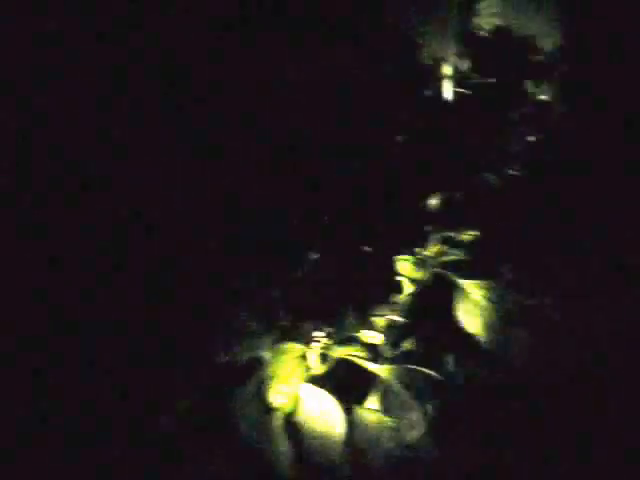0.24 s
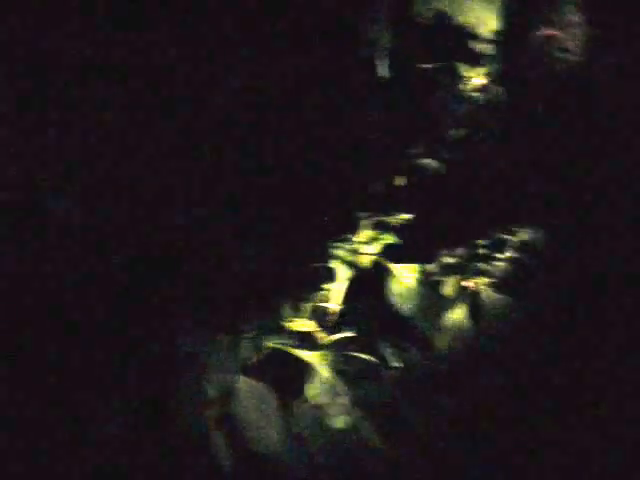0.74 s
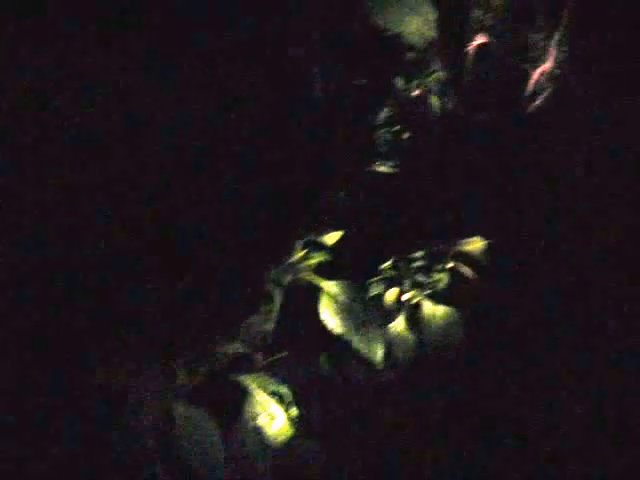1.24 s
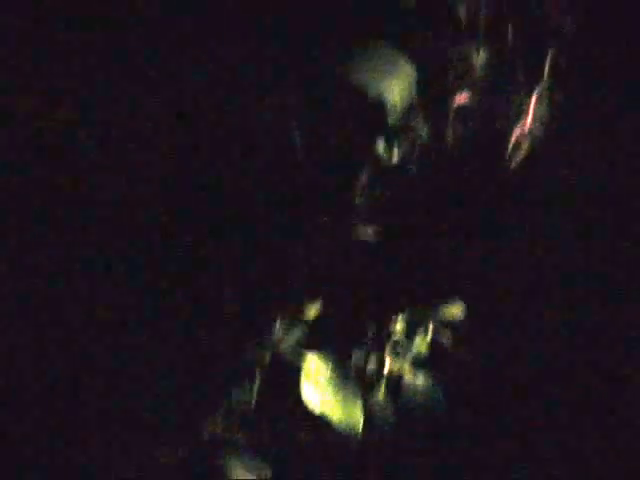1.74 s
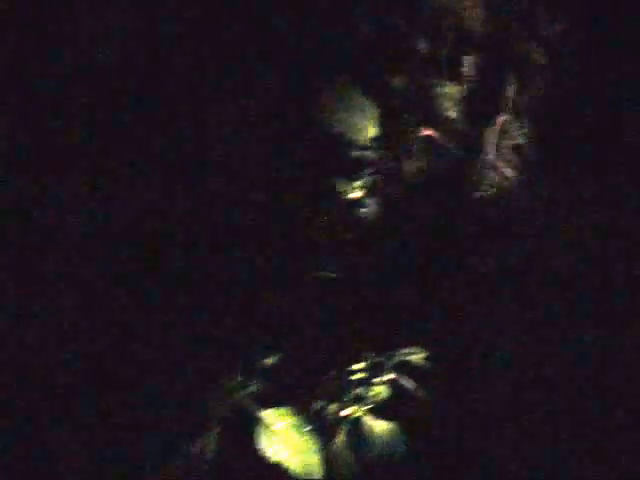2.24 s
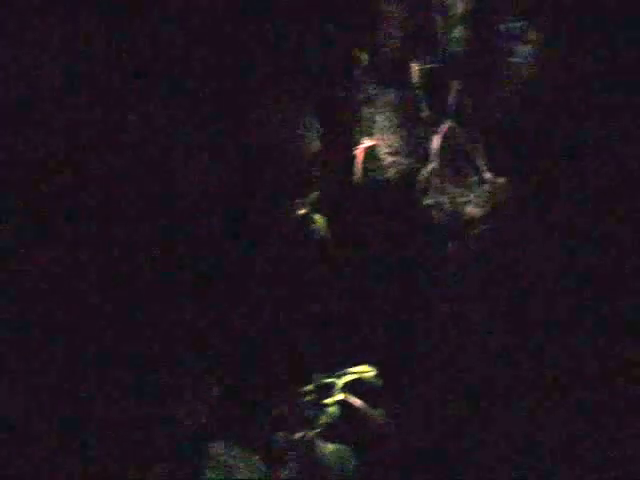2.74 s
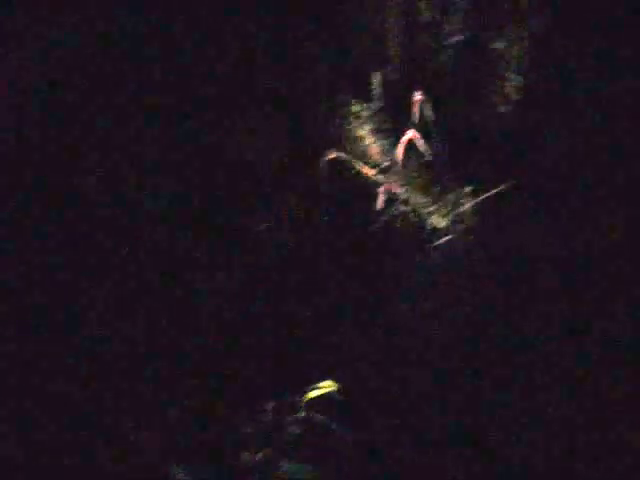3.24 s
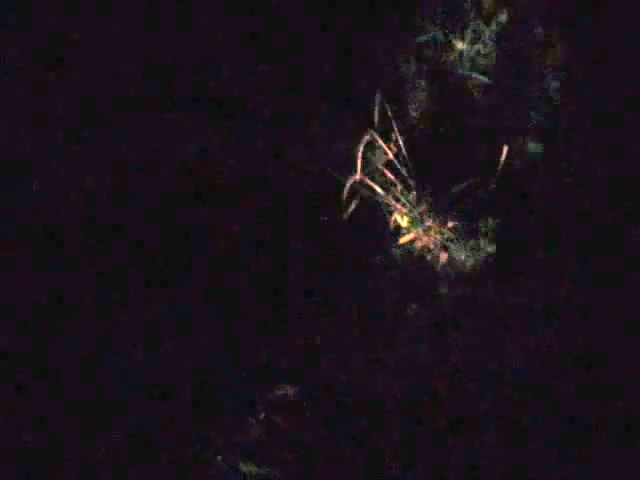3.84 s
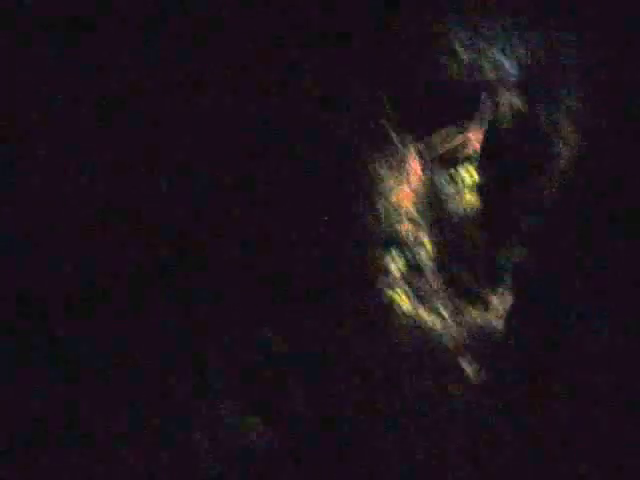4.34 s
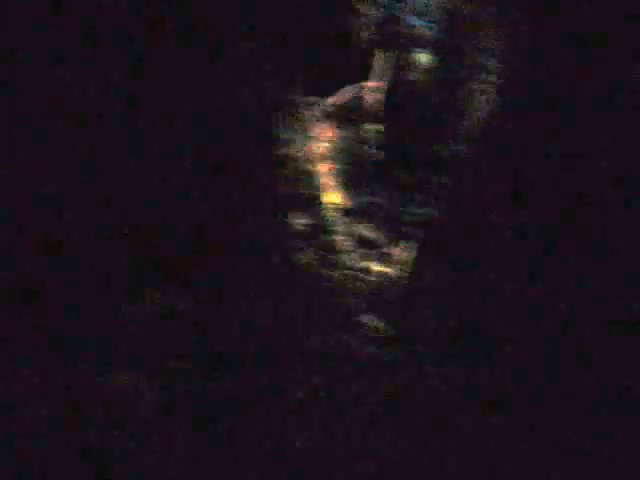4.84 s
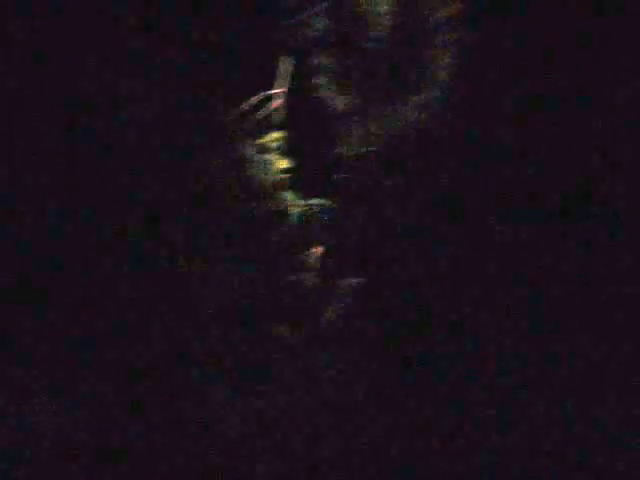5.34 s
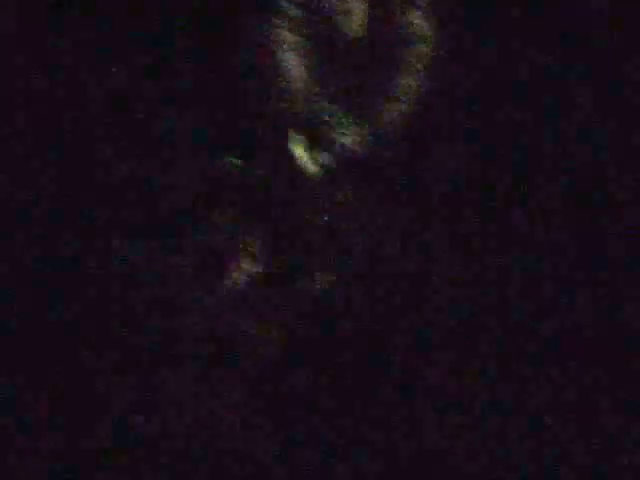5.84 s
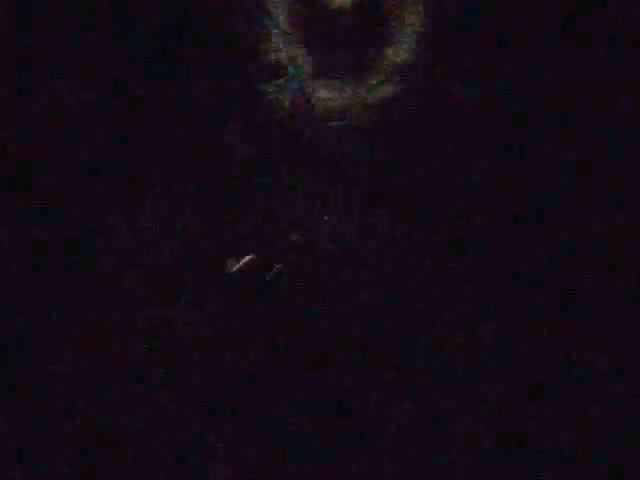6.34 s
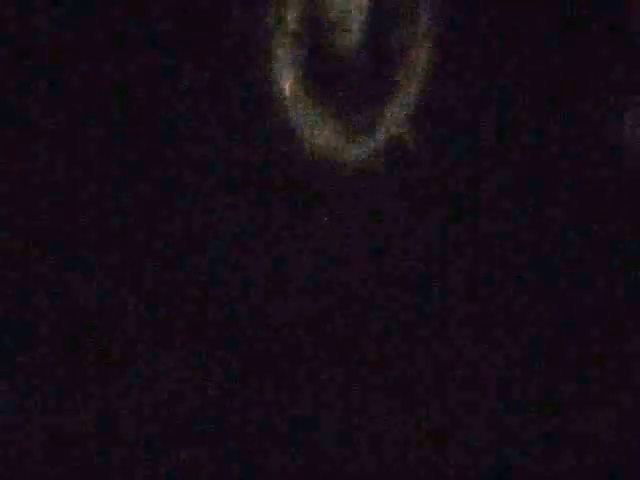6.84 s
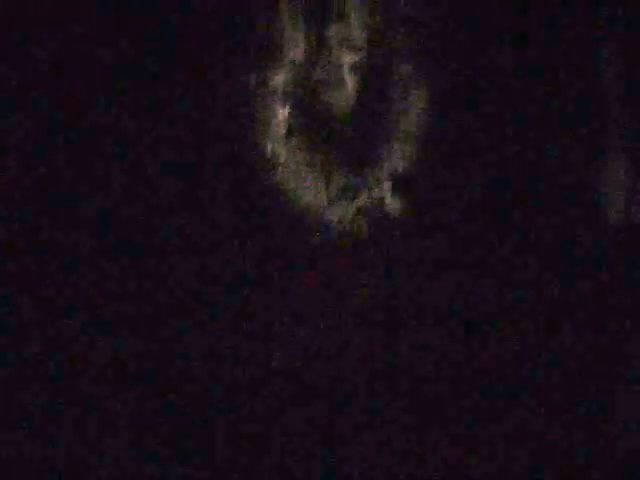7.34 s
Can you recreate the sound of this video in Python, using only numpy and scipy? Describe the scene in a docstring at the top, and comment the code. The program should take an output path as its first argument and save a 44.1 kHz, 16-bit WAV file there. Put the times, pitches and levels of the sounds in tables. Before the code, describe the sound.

Night insects trill steadily outdoors while frogs call close by. First come two strong, buzzing snores like a thumb drawn over a stiff comb, then two fast bursts of speeding knocks, softer croaks and throaty clucks, and finally mostly insects. Short echoes from bank and bushes surround the calls. The small camera microphone sounds coarse, with rough quantised noise, dull rumble and a metallic mirrored edge in the treble.

```python
"""A pond edge at night. From the start a near cricket trills about once a second over far ones and low air rumble.
Two loud frog snores, snap pairs ringing a vocal sac, swell within 0.2-1.6 s; a chuckle of speeding knocks with clucks
follows at 2.6 s over a faint snore, a second chuckle at 3.7 s, two weaker snores and lone clucks at 4.0-5.1 s,
and two faint snores after 6.4 s. A small camera stores it all coarsely: few levels, a low sampling rate and
held samples, which mirror the sound upwards."""
import sys
import numpy as np
from scipy import signal
from scipy.fft import rfft, irfft
from scipy.io import wavfile

SR = 44100
rng = np.random.default_rng(int(sys.argv[2]) if len(sys.argv) > 2 else 0)


def pcm_store(signal):
    """Save signal as 16-bit PCM."""
    levels = np.round(np.clip(np.atleast_2d(signal), -1, 1) * 32767)
    wavfile.write(sys.argv[1], SR, levels.astype(np.int16).T)


N = 334719


def snore(start_s, end_s, lower_s, lower_db, lower_rise_db, upper_s, upper_db, upper_rise_db,
          upper_hz, lower_hz, strong_s, first_per_s, last_per_s, weak, rasp):
    """The throat snaps shut in strong-weak pairs; snaps and the rasp of air behind them ring the vocal sac."""
    # Each row: factor on the centre, width of one pole in Hz, level in dB.
    lower_sac = [(0.861, 288.3, -3), (1.02, 299, 1), (1.21, 321, -3.5), (1.53, 636, -8)]
    # Each row: factor on the centre, width of one pole in Hz, level in dB.
    upper_sac = [(.69, 717, -5.5), (.87, 544, -4), (1.021, 491.4, -1), (1.141, 466, -3)]
    weak_lag_pairs, jitter_pairs, spread_db = .47, .01, .27
    early_weak, doubles_at, doubles_over = .35, .42, .1  # weak/strong ratio; the others are shares of the length
    doubling_db = 9.5  # lower resonances gain this per unit of weak/strong ratio
    puff_s = .0035

    t = np.arange(start_s, end_s, 1 / SR)
    length_s = end_s - start_s
    u = (t - start_s) / length_s

    # running count of pairs, whole at strong_s but for the jitter
    pairs = np.cumsum(np.linspace(first_per_s, last_per_s, len(t))) / SR
    pairs += jitter_pairs * drift(100, len(t)) - np.interp(strong_s, t, pairs)
    pairs = np.maximum.accumulate(pairs)
    strong_snaps = np.diff(np.floor(pairs), prepend=np.floor(pairs[0]))
    lagged = np.floor(pairs - weak_lag_pairs)
    weak_snaps = np.diff(lagged, prepend=lagged[0])
    weak_ratio = np.interp(u, [doubles_at, doubles_at + doubles_over], [early_weak, weak])
    scatter = gain_of(spread_db * np.clip(rng.standard_normal(len(t)), -2, 2))
    snaps = (strong_snaps + weak_ratio * weak_snaps) * scatter

    # each puff of air swells, then dies
    fade = np.exp(-1 / (puff_s * SR))
    puff_level = signal.lfilter([1], [1, -2 * fade, fade ** 2], snaps)
    puffs = evened(puff_level * rng.choice([-1., 1.], len(t)))

    def drive(rasp_share):
        return np.sqrt(1 - rasp_share) * evened(snaps) + np.sqrt(rasp_share) * puffs

    lower_swell_db = hill(u, (lower_s - start_s) / length_s, lower_rise_db, 14.5, 1.5, 1.8)
    lower_swell_db += doubling_db * (weak_ratio - weak)
    lower = gain_of(lower_db + lower_swell_db) * sac(drive(rasp), lower_hz, lower_sac)

    upper_swell_db = hill(u, (upper_s - start_s) / length_s, upper_rise_db, 17.5, 2., 1.7)
    upper_centre_hz = upper_hz + hill(u, .33, 330., 470., 1.8, 1.6)
    # rasp favours the treble
    upper = gain_of(upper_db + upper_swell_db) * sac(drive(rasp ** .6), upper_centre_hz, upper_sac)
    return start_s, (lower + upper) * signal.windows.tukey(len(t), .12)


def chuckle(start_s, count, first_gap_s, last_gap_s, db, upper_db, pitch):
    """Knocks on the vocal sac whose gaps shrink evenly; the first is duller, the last ones fade."""
    knock_s, first_dull_db, fade_db = .014, -3.5, -2
    out = np.zeros(SR // 2)
    gaps_s = np.linspace(first_gap_s, last_gap_s, count - 1)
    for k, knock_at_s in enumerate(np.cumsum(np.r_[0, gaps_s])):
        knock_db = db + fade_db * (k / (count - 1)) ** 3
        knock_upper_db = upper_db + first_dull_db * (k == 0)
        add(out, *note(knock_at_s, knock_db, knock_upper_db, pitch, knock_s))
    return start_s, out


def note(start_s, db, upper_db, pitch, length_s):
    """Knock or cluck: a short bundle of snaps and rasp rings the sac, then a dying tail of rasp."""
    # Sac of the chuckler. Each row: frequency in Hz, width of one pole in Hz, level in dB.
    note_sac = [(1110, 350, 3.5), (1433, 360, -4), (1874, 460, -2), (2340, 390, -1), (2550, 370, 2.5),
                (2986, 500, -4), (3490, 650, -13)]
    pulses_per_s, tail_db, tail_s, lower_tail_db = 250, -3.5, .026, -3.
    t = np.arange(4000) / SR
    snaps = ticks(pulses_per_s * (1 + .12 * drift(300, len(t))))
    rasp = rng.choice([-1., 1.], len(t))
    bundle_level = np.clip((length_s - t) / .004, 0, 1) * np.minimum(t / .0025 + .5, 1)
    bundle = (.65 * evened(snaps) + .75 * rasp) * bundle_level
    tail = gain_of(tail_db) * np.exp(-t / tail_s) * np.minimum(t / .0048, 1) * rasp
    lower = bundle + gain_of(lower_tail_db) * tail
    upper = bundle + tail

    ring = np.zeros(len(t))
    for k, (hz, width_hz, mode_db) in enumerate(note_sac):
        is_upper = k > 2
        level = (-1) ** k * gain_of(mode_db + upper_db * is_upper)
        ring += level * resonate(upper if is_upper else lower, pitch * hz, width_hz)
    near_peak = np.percentile(abs(ring[:3000]), 99)
    return start_s, gain_of(db) * ring / near_peak


def cricket():
    """Near cricket: runs of wing strokes that swell and stop short."""
    # Each row: start in seconds, end in seconds, level at the end in dB before the edge taper.
    trills = [(0., 0.263, -45.5), (0.799, 1.157, -42), (1.821, 2.113, -42), (2.756, 3.069, -41),
              (3.739, 4.04, -41), (4.604, 4.933, -44.5), (5.598, 5.868, -43.5), (6.552, 6.807, -44.5),
              (7.299, 7.589, -44.5)]
    wing_hz, strokes_per_s, swell_db = 4995, 133, 5.5
    out = np.zeros(N)
    for start_s, end_s, db in trills:
        size = round((end_s - start_s) * SR)
        swell = gain_of(db - swell_db * np.linspace(1, 0, size) ** 2)
        edges = signal.windows.tukey(size, .15)
        add(out, start_s, swell * edges * wings(wing_hz, strokes_per_s, size))
    return out


def chorus():
    """Far crickets, two near each pitch, whose stroking wings swell and fade on their own."""
    # Each row: wing frequency in Hz, level in dB.
    far_crickets = [(4400, -7.5), (4520, -6), (4650, -4), (4760, -2), (4870, -2), (4980, -0.5), (5090, -2),
                    (5190, -3.5), (5290, -4.5), (5380, -13)]
    chorus_db = -42.5
    far = np.zeros(N)
    for hz, db in far_crickets + far_crickets:
        level = gain_of(db + 2. * drift(6., N))
        far += level * wings(hz * rng.uniform(.99, 1.01), rng.uniform(90, 140), N)
    return gain_of(chorus_db) * evened(far)


def wings(hz, strokes_per_s, size):
    """Each wing stroke is a short whistle that starts afresh, a little off in pitch and strength."""
    strokes = rng.random() + np.cumsum(strokes_per_s * (1 + .03 * drift(40, size))) / SR
    index, part = strokes.astype(int), strokes % 1
    phase_steps, off, strength = rng.standard_normal((index[-1] + 1, 3)).T
    phase = 1.2 * np.cumsum(phase_steps)[index]  # wanders stroke by stroke
    detuned_s = np.arange(size) / SR + .014 * off[index] * part / strokes_per_s
    whistle = np.sin(2 * np.pi * hz * detuned_s + phase)
    stroke_level = gain_of(2. * strength[index]) * np.sin(np.pi * part) ** 1.5
    return evened(stroke_level * whistle)


def air():
    """Rumble and hiss of the night air and the microphone: coloured noise of wavering level."""
    # Each row: frequency in Hz, level in dB per Hz.
    air_colour = [(20, -6), (35, -8.5), (60, 0), (120, -4), (250, -9.5), (500, -14.5), (900, -17.5),
                  (1500, -20.5), (2500, -24.5), (4000, -26), (5400, -29.5)]
    air_db = -34
    hz = np.fft.rfftfreq(N, 1 / SR)
    knot_hz, knot_db = np.transpose(air_colour)
    colour = gain_of(np.interp(np.log(hz + 1), np.log(knot_hz + 1), knot_db, right=-120))
    noise = irfft(rfft(rng.standard_normal(N)) * colour, N)
    return gain_of(air_db + .7 * drift(6., N)) * evened(noise)


def bank(x):
    """Bank and bushes add sparse echoes of random sign, dying exponentially."""
    t60_s, echoes_db, slot = .25, -2.5, 40  # one echo per slot of samples
    taps = np.zeros(SR // 3)
    at = np.arange(100, len(taps) - slot, slot)
    echoes = rng.choice([-1., 1.], len(at)) * gain_of(-60 * at / SR / t60_s)
    taps[at + rng.integers(0, slot, len(at))] = echoes
    return signal.oaconvolve(x, np.r_[1, gain_of(echoes_db) * taps[1:] / np.linalg.norm(taps)])


def sac(drive, centre_hz, modes):
    """Vocal sac: neighbouring resonances alternate in sign, so that they join without a notch."""
    ring = np.zeros(len(drive))
    for k, (factor, width_hz, db) in enumerate(modes):
        ring += (-1) ** k * gain_of(db) * resonate(drive, factor * centre_hz, width_hz)
    return evened(ring)


def resonate(x, hz, width_hz):
    """Steep resonance: shifts the curve hz down to zero, smooths twice with one pole, shifts back."""
    turn = np.exp(2j * np.pi * np.cumsum(hz * np.ones(len(x))) / SR)
    r = np.exp(-np.pi * width_hz / SR)
    smooth = signal.lfilter([(1 - r) ** 2], [1, -2 * r, r * r], x / turn + 1e-18)
    return 2 * (turn * smooth).real


def hill(u, top, rise, fall, rise_bend, fall_bend):
    """Zero at u = top, bending down by rise towards u = 0 and by fall towards u = 1."""
    before = np.clip(1 - u / top, 0, 1) ** rise_bend
    after = np.clip((u - top) / (1 - top), 0, 1) ** fall_bend
    return -rise * before - fall * after


def drift(per_s, size):
    """Slow chance: straight lines between normal random knots of rms 1."""
    knots = rng.standard_normal(int(size / SR * per_s) + 2)
    return np.interp(np.arange(size) / SR * per_s, np.arange(len(knots)), knots)


def ticks(per_s):
    """One at the start and at every whole-number crossing of the running count."""
    return np.diff(np.floor(np.cumsum(per_s) / SR), prepend=-1.)


def gain_of(db):
    """Amplitude factor of a level in dB."""
    return 10 ** (np.asarray(db) / 20)


def evened(x):
    """Scales to rms 1."""
    return x / np.sqrt(np.mean(x ** 2) + 1e-20)


def add(mix, start_s, sound):
    """Adds sound into mix from start_s, cut at the end of mix."""
    part = mix[round(start_s * SR):][:len(sound)]
    part += sound[:len(part)]


def scene():
    """Every frog call has its own echoes, the near cricket too; far crickets and air lie under them."""
    # Near ones first. Each row: start in s, end in s; lower resonances: loudest at s, top in dB, rise in dB;
    # upper ones: loudest at s, top in dB, rise in dB; highest upper centre in Hz, lower centre in Hz;
    # a strong snap at s, pairs per s at the start, at the end, late weak/strong ratio, rasp share 0-1.
    snores = [ (.22, .92, .8, -26.5, 12., .55, -28.5, 14., 2780, 1110, .7885, 52., 54., .75, .22),
              (.91, 1.62, 1.45, -26, 8., 1.26, -28.5, 16., 2700, 1125, 1.379, 51.2, 53.8, .7, .17),
              (3.96, 4.35, 4.22, -34.5, 10., 4.16, -35.5, 10., 2710, 1120, 4.16, 52.4, 52.4, .4, .12),
              (4.64, 5.1, 5.02, -36, 6., 4.9, -33.5, 10., 2810, 1135, 4.846, 51.4, 51.8, .35, .1),
              (2.66, 3.16, 2.9, -47, 6., 2.88, -40, 8., 2400, 1125, 2.9, 52.7, 52.7, .5, .7),
              (6.42, 6.82, 6.6, -41, 5., 6.58, -48, 8., 2500, 965, 6.6, 52., 52., .5, .5),
              (6.85, 7.24, 7.08, -46.5, 7., 7.04, -42, 9., 2250, 1125, 7., 50., 50., .5, .5)]
    # Each row: start in s, knocks, first gap in s, last gap in s, near-peak level in dB,
    # upper resonances against lower in dB, factor on the sac's pitch.
    chuckles = [(2.584, 7, .039, .0295, -22.5, 1., .97), (3.654, 7, .037, .030, -21, 2.5, 1.01)]
    # Each row: start in s, near-peak level in dB, upper resonances against lower in dB, factor on the sac's pitch.
    clucks = [(2.601, -26, -8, 0.96), (2.808, -27.5, 1.5, 1), (4.395, -32, -17, 0.95),
              (4.549, -29, -13.5, 0.95), (4.712, -26, 0, 0.98), (5.034, -22, -4, 0.99),
              (5.051, -23.5, -9, .97), (5.08, -26.5, -13.5, .97)]
    cluck_s = .019
    calls = [snore(*row) for row in snores]
    calls += [chuckle(*row) for row in chuckles]
    calls += [note(*row, cluck_s) for row in clucks]
    frogs = np.zeros(N)
    for start_s, call in calls:
        add(frogs, start_s, bank(call))
    return (frogs + bank(cricket())[:N] + chorus() + air())[None]


def record(dry):
    """Holds each stored sample, rounds to coarse levels one step below zero, then limits the band."""
    stored_per_s, step, edge_hz = 11026, .0292, 15450
    stored = np.floor(np.arange(N) * stored_per_s / SR)
    held = dry[:, np.searchsorted(stored, stored)]
    stepped = step * (np.round(held / step) - 1)
    taps = signal.firwin(511, edge_hz, window=("kaiser", 9), fs=SR)
    padded = np.pad(stepped, ((0, 0), (255, 255)), "edge")
    return signal.oaconvolve(padded, taps[None], "valid")


dry = scene()
out = record(dry)
pcm_store(out)
```